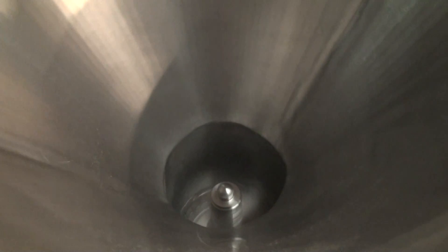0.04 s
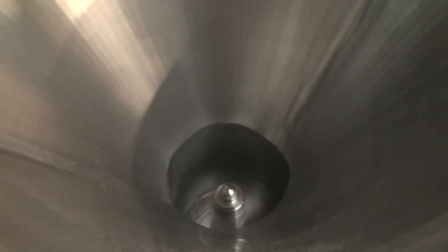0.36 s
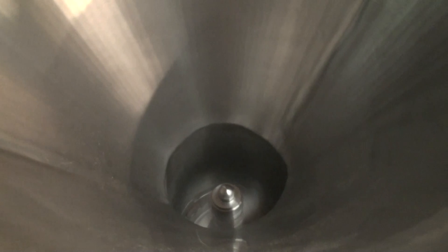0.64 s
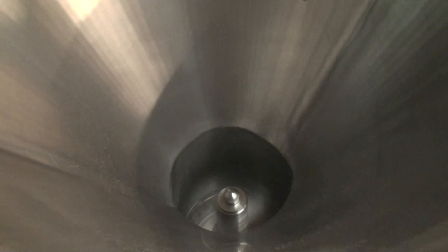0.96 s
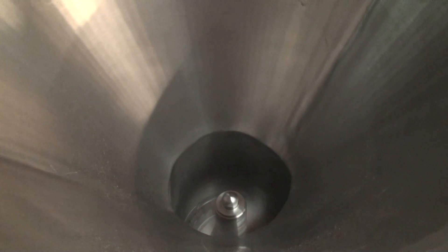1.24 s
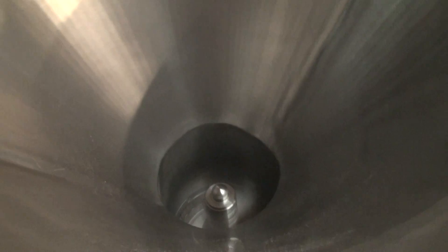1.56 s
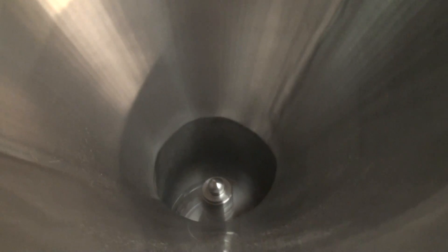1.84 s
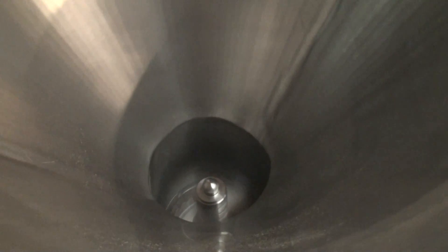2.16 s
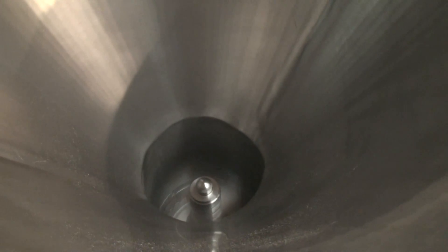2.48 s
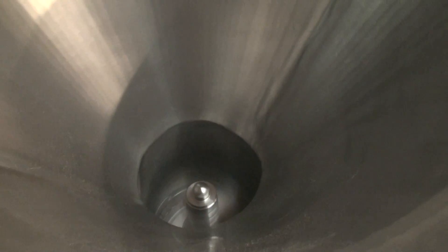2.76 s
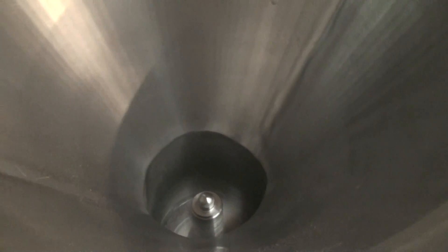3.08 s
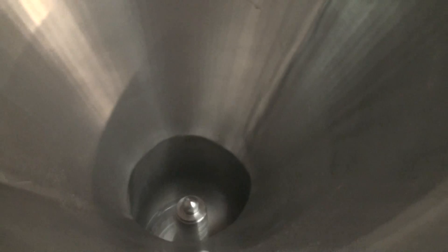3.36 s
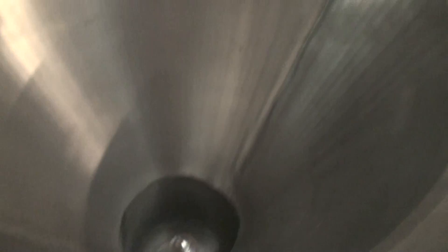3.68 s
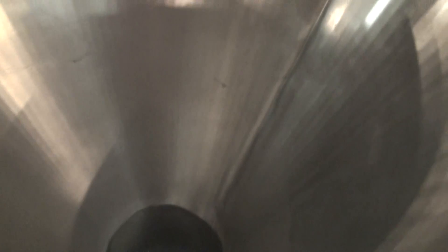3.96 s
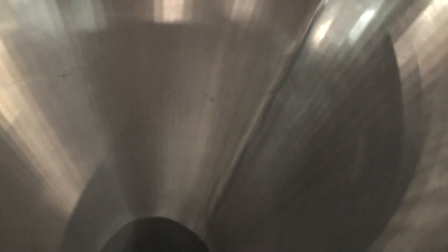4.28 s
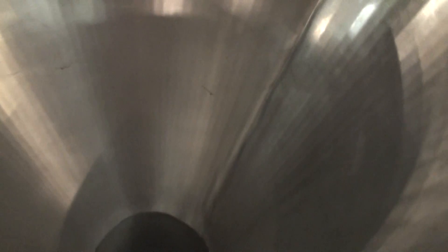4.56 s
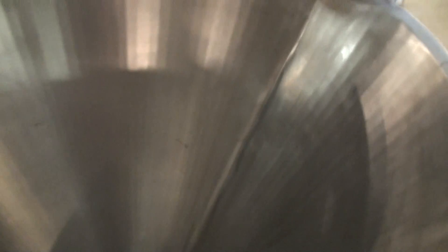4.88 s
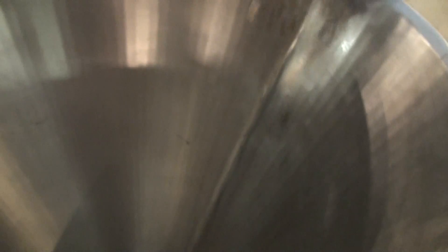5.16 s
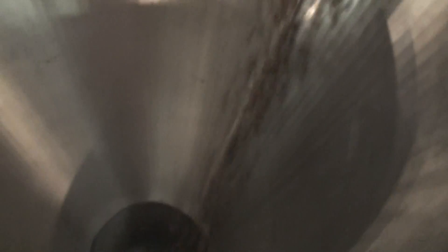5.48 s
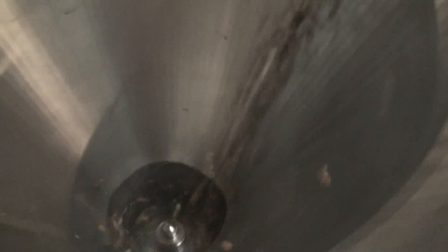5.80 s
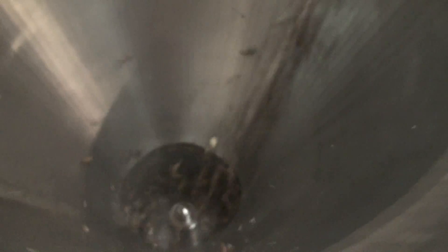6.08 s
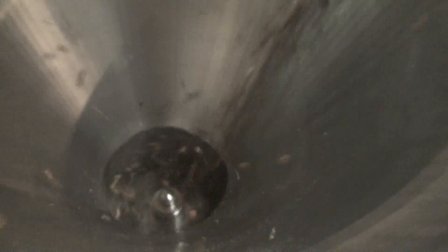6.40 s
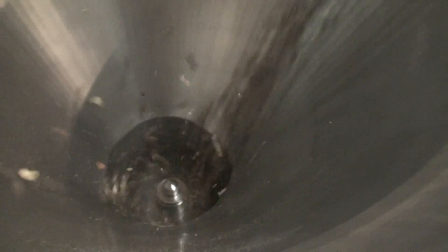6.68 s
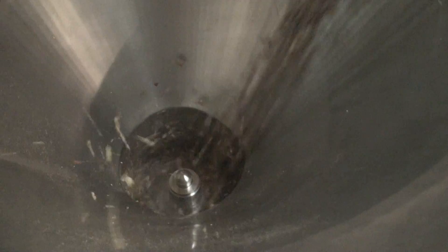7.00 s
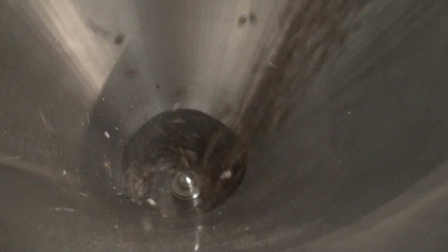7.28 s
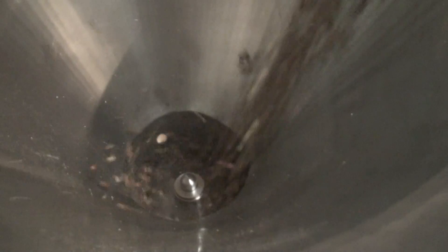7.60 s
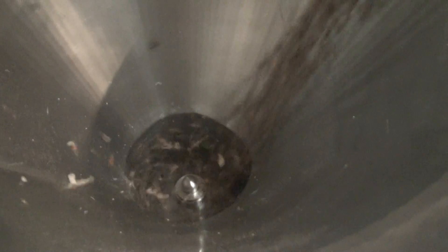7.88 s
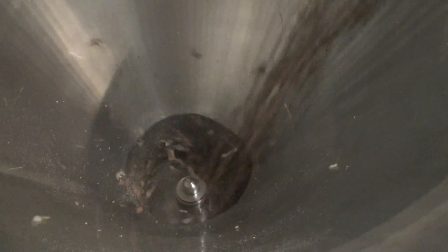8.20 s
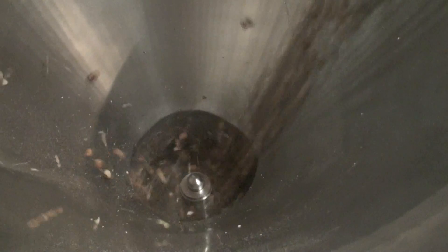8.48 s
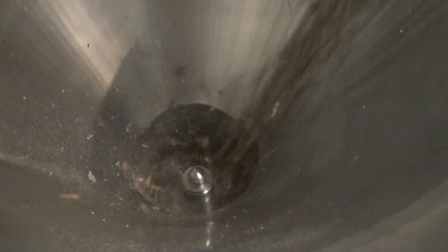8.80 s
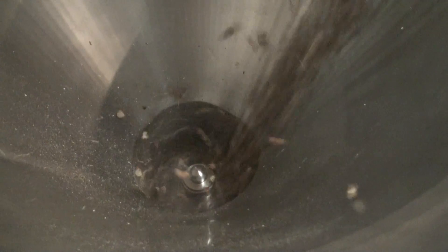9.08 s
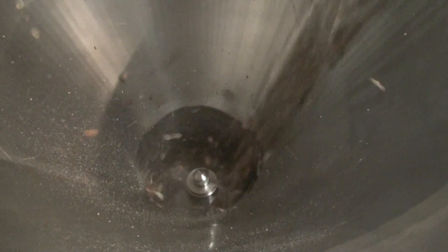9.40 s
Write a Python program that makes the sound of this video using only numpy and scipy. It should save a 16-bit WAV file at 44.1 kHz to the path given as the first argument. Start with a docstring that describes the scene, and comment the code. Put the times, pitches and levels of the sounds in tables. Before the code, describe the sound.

Steady motor hum and shrill whine give way to loud cracking, clattering and churning as nuts hit a grinder's spinning blades.

```python
"""Just above the steel hopper of a nut grinder. Running empty, its four-bladed rotor hums at the
blade-passing frequency, over turbulent air and a whine of shaft harmonics that shifts as the microphone
moves. From 5.4 s nuts pour in: they fracture on the blades, and their impacts excite the hopper's modes.
Gain control ducks the hum under them. As the chamber fills, a coarser churning grows and meal damps
the rotor."""
import sys
import numpy as np
from scipy import signal
from scipy.fft import rfft, irfft
from scipy.io import wavfile
from scipy.ndimage import uniform_filter1d, map_coordinates

SR = 44100
rng = np.random.default_rng(int(sys.argv[2]) if len(sys.argv) > 2 else 0)


def generate_wav(sig):
    """Save sig (samples, or channels by samples) to the path in sys.argv[1] as 16-bit PCM at SR."""
    pcm = np.round(np.clip(np.atleast_2d(sig).T, -1, 1) * 32767).astype(np.int16)
    wavfile.write(sys.argv[1], SR, pcm)


N = 416744
TIME = np.arange(N) / SR
BINS = np.fft.rfftfreq(N, 1 / SR)

SHAFT_HZ = 49.97
HANDFUL_AT_S, STREAM_AT_S, STREAM_RISE_S = 5.405, 5.52, 0.22

# All levels are relative: the scene's gains and the gain control act on them afterwards.
# microphone path: t/s, position (0 over the throat, 1 halfway up the wall, 2 at the rim)
MIC_PATH = [(0, 0.018), (3.55, 0), (3.95, 0.96), (4.65, 1.2), (4.9, 1.9), (5.35, 1.9), (5.6, 0.64),
            (6.1, 0.16)]
# left port against right port: f/Hz, level/dB
PORT_LEVEL = [(60, 1.0), (99, 0), (160, 3.5), (270, -0.9), (450, 0), (740, -3), (1220, -1.5), (2010, 0.28),
              (3330, 1), (5500, 1), (9080, -0.3), (15000, -0.3)]
# lead of the left port: f/Hz, phase/rad
PORT_PHASE = [(0, 0.16), (260, 0.52), (600, 0.54), (1980, 0.33), (2330, 0.34), (5430, 0.25), (9300, -0.27),
              (10200, -0.7), (11200, 0.0), (16000, -0.0)]
# likeness of the ports: f/Hz, coherence (0-1)
PORT_COHERENCE = [(30, 0.3), (90, 0.83), (200, 0.79), (1000, 0.85), (5000, 0.99), (8500, 0.87), (12500, 1)]

# air stirred by the rotor: f/Hz, spectral level/dB
AIR_SPECTRUM = [(25, -85), (70, -77), (170, -62), (360, -61.5), (520, -69), (1200, -66), (2450, -73),
                (3400, -68), (5400, -77), (6600, -72), (7600, -81.5), (8700, -81), (10900, -87.5),
                (12200, -80), (14500, -90), (16000, -98)]
# second and third blade harmonics: t/s, level/dB re the blade tone
BLADE_SECOND = [(0, -4), (3.5, -3.3), (5.2, -2.2), (6.2, -2.3), (7.7, -3.7), (7.87, -5), (7.98, -10),
                (8.3, -14), (8.6, -17)]
BLADE_THIRD = [(0, -10.5), (3.3, -11), (3.7, -13), (4.6, -12), (5.1, -10), (6.8, -11.5), (7.6, -16),
               (8.1, -11.5), (8.3, -24)]
# weak shaft harmonics: f/Hz, level/dB of each
WEAK_HARMONICS = [(60, -54), (300, -54), (1000, -63), (2500, -63.5), (3000, -57), (3150, -67), (3330, -54),
                  (4300, -65.5), (5200, -59), (5700, -62), (6500, -55), (7600, -68), (8400, -64),
                  (10800, -73), (11900, -67), (13500, -73), (16000, -80)]
# strong shaft harmonics: order, then level/dB at throat, wall and rim
STRONG_HARMONICS = [(1, -62, -64, -78), (2, -57, -54, -59), (3, -47, -48, -49), (5, -44, -46, -61),
                    (7, -49, -51, -50), (9, -48, -45, -58), (13, -53, -56, -54), (16, -48, -48, -47),
                    (20, -44, -51, -47), (24, -40, -39, -40), (27, -47, -50, -49), (28, -48, -51, -47),
                    (29, -50, -52, -49), (32, -51, -42, -45), (33, -46, -50, -46), (36, -38, -44, -40),
                    (40, -46, -44, -49), (44, -43, -50, -47), (48, -53, -51, -54), (66, -51, -50, -52),
                    (68, -42, -43, -43), (69, -47, -47, -49), (70, -40, -42, -39), (71, -42, -42, -45),
                    (73, -54, -50, -45), (77, -55, -55, -55), (82, -52, -56, -62), (90, -50, -50, -64),
                    (91, -49, -49, -54), (94, -44.5, -47, -49), (97, -53, -51, -51), (99, -44, -47, -52),
                    (100, -45, -47, -47), (102, -51, -53, -54), (104, -51, -53, -53), (105, -51, -53, -43),
                    (106, -53, -53, -53), (107, -51, -55, -52), (108, -52, -53, -53), (109, -54, -49, -46),
                    (118, -52, -49, -54), (123, -54, -57, -57), (124, -52, -50, -53), (125, -49, -46, -45),
                    (130, -51, -56, -58), (134, -46, -49, -54), (135, -51, -54, -52), (141, -59, -50, -48),
                    (144, -52, -51, -50), (145, -55, -52, -47), (153, -59, -61, -61), (154, -50, -52, -53),
                    (159, -58, -58, -70), (161, -58, -64, -70), (163, -58, -53, -55), (164, -60, -58, -57),
                    (170, -56, -57, -59), (181, -61, -65, -63), (190, -50, -54, -60), (196, -60, -59, -56),
                    (199, -54, -55, -54), (202, -61, -63, -69), (217, -62, -62, -66), (226, -62, -63, -61),
                    (235, -53, -52, -47), (239, -64, -62, -60), (243, -63, -57, -75), (244, -41, -42, -43),
                    (245, -52, -54, -59), (253, -59, -60, -57), (262, -58, -60, -60), (271, -58, -62, -57),
                    (280, -66, -60, -67), (307, -62, -66, -68)]
# four shrill shaft harmonics: order
SHRILL_ORDERS = [127, 136, 172, 208]
# their swells as the microphone moves, one list each: t/s, level/dB
SHRILL_LEVELS = [
    [(0, -35), (3.5, -35), (3.65, -37), (4.3, -36.5), (4.9, -38.5), (5.1, -42), (6.1, -32)],
    [(0, -37), (1, -35.5), (3.5, -35), (3.8, -37), (3.88, -34.5), (4, -35), (4.12, -41), (4.4, -38),
     (4.74, -39), (4.83, -33), (5, -42), (5.2, -44), (6.1, -36)],
    [(0, -50), (3.42, -47), (3.83, -53), (3.9, -46), (4, -46), (4.08, -57), (4.2, -47), (4.35, -47),
     (4.56, -55), (4.76, -45), (4.85, -52), (5.05, -44), (5.3, -46), (5.4, -51)],
    [(0, -52), (2.9, -51), (3.35, -48), (3.5, -52), (4, -50), (4.08, -56), (4.25, -48.5), (4.5, -50),
     (4.8, -49), (4.95, -43), (5.35, -46), (6.1, -53)],
]
# whistle: level/dB at throat, wall and rim
WHISTLE_LEVELS = [-36.5, -41, -39.5]
# shaft harmonics under load: order, start t/s, end t/s, level/dB
LOAD_HARMONICS = [(16, 6.6, 7.9, -42), (20, 7.25, 7.9, -47), (9, 8.2, 8.7, -42), (9, 8.7, 9.6, -48),
                  (18, 5.8, 9.6, -44.5), (27, 8.3, 9.6, -44)]

# dull thumps: t/s, level/dB
THUMP_EVENTS = [(5.461, -34), (6.424, -41), (6.689, -38), (7.109, -42), (7.274, -43), (7.347, -46),
                (7.37, -47), (7.488, -50), (7.741, -48), (7.782, -50)]
# whole nuts knocking in the throat: t/s, level/dB, f/Hz
KNOCK_EVENTS = [(6.428, -30, 486), (7.26, -31, 790), (7.371, -25, 580), (7.426, -29, 760),
                (7.446, -31, 700), (7.524, -27, 430), (7.648, -20.5, 250), (7.782, -24.5, 380),
                (7.861, -29, 230), (7.902, -28, 613), (8.09, -33, 450), (8.328, -32, 660),
                (8.378, -32, 900), (8.703, -33, 560)]
# hard strikes on one hopper mode: t/s, f/Hz, level/dB, skipping time/s
STRIKE_EVENTS = [(5.83, 2293, -33, .08), (5.87, 2543, -30, .04), (5.975, 4020, -29, .03),
                 (6.025, 3146, -33, .2), (6.3, 3146, -33, .07), (6.31, 2543, -32, .04),
                 (6.72, 3146, -36, .07), (6.93, 3960, -31, .03), (6.98, 2260, -33, .04),
                 (7.19, 3910, -32, .04), (7.28, 3146, -31, .17), (7.35, 3943, -29, 0.05),
                 (7.55, 2545, -35, .03), (7.655, 2545, -33, .04), (7.78, 3146, -33, 0.07),
                 (7.78, 3900, -30, .05), (8.43, 2535, -29.5, .08), (8.26, 3146, -37, .06),
                 (8.5, 3146, -35, .16), (8.58, 3935, -31, .03), (8.83, 3935, -26, .04),
                 (8.85, 3146, -37, .08), (9.02, 3146, -34, .14), (9.09, 2555, -31, .06)]
# handfuls landing on the wall: t/s, level/dB, decay time/s
SPLASH_EVENTS = [(5.407, -17, .012), (5.414, -14, .016), (5.433, -13, .011), (5.465, -13.5, 0.013),
                 (5.545, -16, .016), (5.602, -12, .018), (5.6432, -15, .012), (5.745, -16, .014),
                 (5.982, -16, .018), (6.0494, -15, .025), (6.427, -13, .009), (6.8418, -13.5, .018),
                 (6.95, -17, .045), (7.1503, -18, 0.011), (7.3644, -12.5, .022), (7.4284, -11, .03),
                 (7.4885, -16, .01), (7.5294, -15, .025), (7.648, -11, .025), (7.775, -12.5, .025),
                 (7.84, -16, .03), (7.8854, -15, .025), (8.037, -15, .012), (8.2, -14, .018),
                 (8.352, -15, .012), (8.4104, -15, .014), (8.85, -14, .022), (8.9636, -16, .015),
                 (9.008, -17, .012), (9.0974, -15, .028), (9.235, -17, .025), (9.3447, -13, .016),
                 (9.4186, -16, .012)]
# spectra of a knock, a clatter on the wall and a splinter's tick: f/Hz, level/dB
KNOCK_SPECTRUM = [(30, -22), (80, -11), (220, 4), (450, 4), (750, 2), (1200, 0), (2000, -8), (9000, -23),
                  (15000, -30)]
WALL_SPECTRUM = [(1000, -32), (4000, -17), (5400, -1), (6300, 5.5), (7200, 3), (8000, -1), (10500, -9),
                 (12200, -5), (14000, -18), (16000, -24)]
SPLINTER_SPECTRUM = [(1000, -30), (5000, -5), (7500, 0), (9500, -2), (10800, -6), (12200, 2), (14000, -8),
                     (16000, -11)]
# loose nuts tumbling, meal churning and nuts cracking: f/Hz, spectral level/dB
TUMBLE_SPECTRUM = [(20, -81), (50, -82), (100, -73.5), (200, -75), (400, -87), (900, -101), (3000, -130)]
CHURN_SPECTRUM = [(50, -106), (120, -84), (300, -76), (700, -77), (950, -70), (1200, -71), (1700, -63),
                  (2500, -67), (3400, -60), (5000, -61.5), (7000, -76), (10000, -71), (16000, -100)]
CRACK_SPECTRUM = [(30, -106), (120, -77), (300, -73), (700, -77), (1300, -76.5), (1800, -74), (2300, -66),
                  (4500, -63), (5400, -64), (6000, -60), (7100, -61.5), (7600, -65), (11000, -74.5),
                  (12300, -69.5), (14300, -82), (16000, -87)]
# hopper and casing modes: f/Hz, bandwidth/Hz, level/dB re the cracking
HOPPER_MODES = [(804, 30, 4), (985, 40, 6), (1488, 35, 9), (1700, 94, 3), (1770, 12, 1), (1985, 30, 4.5),
                (2110, 60, 4), (2243, 21, 8), (2293, 9, 12), (2365, 19, 6), (2542, 21, 12.5), (2760, 50, 1),
                (3143, 7, 13), (3570, 37, -1), (3860, 31, 4.5), (3936, 22, 10), (4020, 47, 2.5),
                (4295, 25, 4), (4885, 50, 7), (5680, 170, 1), (5950, 80, 7), (6480, 110, 5), (7140, 100, 5),
                (8390, 40, 4), (8980, 40, 2), (9860, 81, 4.5), (11380, 36, 8), (11720, 180, 2)]


def gain_of(db):
    """Amplitude ratio: a factor of ten per 20 dB."""
    return 10 ** (np.asarray(db) / 20)


def unit_rms(x):
    """Normalisation to unit mean power."""
    return x / np.sqrt(np.mean(x ** 2) + 1e-20)


def at_hz(spectrum, hz):
    """Interpolation on a logarithmic frequency axis."""
    f, value = np.transpose(spectrum)
    return np.interp(np.log(hz + 1), np.log(f + 1), value)


def curve(points, t=TIME):
    """Linear interpolation in time."""
    return np.interp(t, *np.transpose(points))


def ramp(start_s, length_s):
    """Linear transition from 0 to 1, then held."""
    return np.clip((TIME - start_s) / length_s, 0, 1)


def add(mix, start_s, sound):
    """Superposition of a delayed sound on the mix."""
    part = mix[round(start_s * SR):][:len(sound)]
    part += sound[:len(part)]


def drift(per_s):
    """Slow random modulation of about unit rms."""
    knots = rng.standard_normal(2048)
    return 1.2 * np.interp(TIME * per_s, np.arange(len(knots)), knots)


def impacts(per_s, spread_db):
    """Poisson train of impulses, a few much larger than the rest."""
    size = gain_of(spread_db * np.minimum(rng.exponential(1, N), 4))
    return unit_rms(size * rng.choice([-1, 1], N) * (rng.random(N) < per_s / SR))


def burst(spectrum, decay_s, rise_share=0.13):
    """Unresolved impacts merge into noise that builds, then decays exponentially."""
    t = np.arange(SR // 6) / SR
    shape = gain_of(at_hz(spectrum, np.fft.rfftfreq(len(t), 1 / SR)))
    noise = unit_rms(irfft(rfft(rng.standard_normal(len(t))) * shape, len(t)))
    return noise * (1 - np.exp(-t / (rise_share * decay_s))) * np.exp(-t / decay_s)


def ticks(spectrum, per_s, spread_db, decay_s, kinds):
    """Shot noise: impulse trains, each convolved with its own short burst."""
    return sum(signal.oaconvolve(impacts(per_s / kinds, spread_db), burst(spectrum, decay_s))[:N]
               for _ in range(kinds))


def coloured(drive, spectrum):
    """Partial coherence: a filtered white drive reaches both ports, with a diffuse share that differs."""
    coherence = np.clip(at_hz(PORT_COHERENCE, BINS), 0, 1)
    direct = rfft(drive) * np.sqrt((1 + coherence) / 2)
    diffuse = rfft(rng.standard_normal(N)) * np.sqrt((1 - coherence) / 2)
    ports = np.array([direct + diffuse, direct - diffuse])
    return irfft(ports * gain_of(at_hz(spectrum, BINS)) * np.sqrt(SR / 2), N)


def air_rush(angle, chop=0.22, gust_db=0.4, rim_db=-0.35):
    """Turbulence noise, amplitude-modulated by the passing blades."""
    chopped = unit_rms(rng.standard_normal(N) * (1 + chop * np.cos(4 * angle)))
    air = coloured(chopped, AIR_SPECTRUM)
    return air * gain_of(gust_db * drift(15) + rim_db * np.clip(curve(MIC_PATH), 0, 1))


def blade_hum(angle, tone_db=-21.5, flutter_db=0.42, wall_db=-0.2):
    """Blade-passing tone: four pressure dips a turn. The choking throat absorbs its upper harmonics."""
    level_db = tone_db + wall_db * np.sin(np.pi * curve(MIC_PATH) / 2) ** 2 + flutter_db * drift(25)
    second = gain_of(curve(BLADE_SECOND)) * np.cos(8 * angle)
    third = gain_of(curve(BLADE_THIRD)) * np.cos(12 * angle + 2)  # phase-shifted by the throat
    return -np.sqrt(2) * gain_of(level_db) * (np.cos(4 * angle) + second + third)


def rub_phases(orders, rub_hz=3480, width_hz=420, sweep=0.071):
    """Quadratic phase, in turns, gathers one band into a light rub's rising chirp; the rest is random."""
    offset = orders - rub_hz / SHAFT_HZ
    return np.where(abs(offset) * SHAFT_HZ < width_hz / 2, -sweep * offset ** 2, rng.random(len(orders)))


def shaft_whine(angle, waver_db=0.5, moving_waver_db=1.5, scatter_db=2.5, turn_size=2048, frames=240):
    """A rattle repeated every turn has a line spectrum; its levels shift as the microphone moves."""
    orders = np.arange(1, 330)
    moments = np.linspace(0, TIME[-1], frames)
    position = curve(MIC_PATH, moments)
    weak_db = at_hz(WEAK_HARMONICS, orders * SHAFT_HZ) + scatter_db * rng.uniform(-1, 1, len(orders))
    level_db = np.tile(weak_db, (frames, 1))
    for order, *by_position_db in STRONG_HARMONICS:
        level_db[:, round(order) - 1] = np.interp(position, [0, 1, 2], by_position_db)
    waver = unit_rms(uniform_filter1d(rng.standard_normal(level_db.shape), size=8, axis=0))
    level_db += waver * (waver_db + moving_waver_db * np.clip(position, 0, 1)[:, None])
    for order, points in zip(SHRILL_ORDERS, SHRILL_LEVELS):
        level_db[:, order - 1] = curve(points, moments) + waver_db * waver[:, order - 1]
    lines = gain_of(level_db) * np.exp(2j * np.pi * rub_phases(orders))
    # the waveform of one turn for each frame, read out at the shaft's angle
    turns = irfft(np.pad(lines, ((0, 0), (1, 0))), turn_size) * turn_size / np.sqrt(2)
    frame = TIME / TIME[-1] * (frames - 1)
    within_turn = angle / (2 * np.pi) % 1 * turn_size
    return map_coordinates(turns, [frame, within_turn], order=3, mode="grid-wrap")


def whistle(angle, order=63, vibrato_rad=1.0, waver_db=0.6):
    """Phase modulation: the pitch of a clean whistle swings once a turn."""
    level_db = np.interp(curve(MIC_PATH), [0, 1, 2], WHISTLE_LEVELS) + waver_db * drift(8)
    return np.sqrt(2) * gain_of(level_db) * np.sin(order * angle + vibrato_rad * np.sin(angle))


def strain(angle, waver_db=2.0, fade_s=0.1):
    """Forced vibration: faint harmonics come and go as the shaft works against the meal."""
    out = np.zeros(N)
    for order, start, end, db in LOAD_HARMONICS:
        held = ramp(start, fade_s) * (1 - ramp(end - fade_s, fade_s))
        out += held * gain_of(db + waver_db * drift(9)) * np.sin(round(order) * angle)
    return np.sqrt(2) * out


def pour(handful_s=0.14, handful_flow=0.34):
    """Flow of nuts: a parabolic pulse for the first handful, then a steady stream of 1."""
    u = ramp(HANDFUL_AT_S, handful_s)
    return handful_flow * 4 * u * (1 - u) + ramp(STREAM_AT_S, STREAM_RISE_S)


def fullness(first_fill=0.095, midpoint_s=8.27, filling_s=0.34):
    """Logistic growth of the meal in the chamber, from a small share towards 1."""
    return first_fill + (1 - first_fill) / (1 + np.exp((midpoint_s - TIME) / filling_s))


def thumps(push_s=0.0024, boost_db=8.0):
    """Low pressure pulses: one compression, then a weaker rarefaction."""
    u, out = np.arange(SR // 10) / SR / push_s, np.zeros(N)
    for start, db in THUMP_EVENTS:
        add(out, start, gain_of(db + boost_db) * u * (2 - u) * np.exp(-u))
    return out


def knocks(crack_s=0.008, crack_db=-3.0, body_s=0.006, body_db=-6.0):
    """Impact of a whole nut on a blade: a broadband crack and a hollow damped oscillation."""
    t, out = np.arange(SR // 6) / SR, np.zeros(N)
    for start, db, hz in KNOCK_EVENTS:
        crack = gain_of(crack_db) * burst(KNOCK_SPECTRUM, crack_s)
        body = gain_of(body_db) * np.exp(-t / body_s) * np.sin(2 * np.pi * hz * t)
        add(out, start, gain_of(db) * (crack + body))
    return out


def strikes(rise_s=0.01, decay_s=0.046, uneven=0.22, wander_rad=0.55):
    """Resonance: a nut skipping unevenly along the steel pumps one mode, which then decays freely."""
    t, out = np.arange(SR // 2) / SR, np.zeros(N)
    for start, hz, db, skip_s in STRIKE_EVENTS:
        swell = (1 - np.exp(-t / rise_s)) * np.exp(-np.maximum(t - skip_s, 0) / decay_s)
        swell *= 1 + uneven * drift(92)[:len(t)]
        phase = 2 * np.pi * hz * t + wander_rad * drift(28)[:len(t)]
        add(out, start, gain_of(db) * swell * np.sin(phase))
    return out


def splashes(trim_db=-8.0):
    """Incoherent summation: each handful lands on the wall as one bright clatter."""
    out = np.zeros(N)
    for start, db, decay_s in SPLASH_EVENTS:
        add(out, start, gain_of(db + trim_db) * burst(WALL_SPECTRUM, decay_s))
    return out


def chips(fill, gain_db=-37.5):
    """Rebound: chips flung back up tick on the wall, with power proportional to the fill."""
    ticking = ticks(WALL_SPECTRUM, per_s=70, spread_db=2.2, decay_s=0.0049, kinds=5)
    return unit_rms(ticking) * gain_of(gain_db) * np.sqrt(fill)


def splinters(flow, fill, flurry_db=3.3, gain_db=-39, full_db=1.5):
    """Brief contacts radiate treble: flurries of hard splinters on steel, louder from a full chamber."""
    ticking = ticks(SPLINTER_SPECTRUM, per_s=300, spread_db=2.5, decay_s=0.00065, kinds=8)
    flurries = unit_rms(ticking * gain_of(flurry_db * drift(13)))
    return flurries * flow ** 2 * gain_of(gain_db + full_db * fill)


def hopper_ring(blows_per_s=900, clump_db=0.8, trim_db=-0.5, lowest_hz=150):
    """Modal excitation: fragments hit different places, so each mode gets its own train of blows."""
    t, out = np.arange(SR // 4) / SR, np.zeros(N)
    for hz, width_hz, db in HOPPER_MODES:
        response = np.exp(-np.pi * width_hz * t) * np.sin(2 * np.pi * hz * t)
        blows = impacts(blows_per_s, spread_db=1.0) * gain_of(clump_db * drift(7))
        ringing = unit_rms(signal.oaconvolve(blows, response)[:N])
        noise_band_hz = np.pi * width_hz / 2
        out += ringing * gain_of(db + trim_db + at_hz(CRACK_SPECTRUM, hz)) * np.sqrt(noise_band_hz)
    return signal.sosfilt(signal.butter(1, lowest_hz, "high", fs=SR, output="sos"), out)


def wall_reflections(x, t60_s=0.035):
    """All-pass reverberation: dense echoes between the steel walls smear impacts without colour."""
    t = np.arange(SR // 10) / SR
    echoes = rfft(rng.standard_normal(len(t)) * gain_of(-60 * t / t60_s), N)
    return irfft(rfft(x) * echoes / (abs(echoes) + 1e-9), N)


def grinding(angle, flow, cracks_per_s=14000, clump_db=0.55, swing=0.044, surge_db=1.0):
    """Brittle fracture in clumps, harder once a turn; tumbling yields to churning as the chamber fills."""
    fill = fullness()
    bite = gain_of(clump_db * drift(110)) * (1 + swing * np.cos(angle))
    shatter = unit_rms(wall_reflections(impacts(cracks_per_s, spread_db=1.8) * bite))
    cracking = coloured(shatter, CRACK_SPECTRUM) + hopper_ring() * np.sqrt(flow)
    cracking *= flow ** 0.25 * gain_of(surge_db * drift(22))
    churning = coloured(rng.standard_normal(N) * bite, CHURN_SPECTRUM) * fill
    tumbling = coloured(impacts(per_s=400, spread_db=4.0), TUMBLE_SPECTRUM) * (1 - fill) ** 2
    contents = (churning + tumbling + chips(fill)) * ramp(HANDFUL_AT_S, 0.033)
    return cracking + contents + splinters(flow, fill)


def gain_control(x, threshold_db=-25.5, ratio=3.48, follow_s=0.016, sensed_hz=1500):
    """Compression: loud treble turns everything down, so the hum ducks under the nuts."""
    treble = signal.sosfilt(signal.butter(2, sensed_hz, "high", fs=SR, output="sos"), x.mean(0))
    pole = np.exp(-1 / (follow_s * SR))
    level_db = 10 * np.log10(signal.lfilter([1 - pole], [1, -pole], treble ** 2) + 1e-12)
    return x * gain_of(-np.maximum(level_db - threshold_db, 0) * (1 - 1 / ratio))


def scene(choke_db=-7.5, stream_db=9, build_db_per_s=1.97):
    """Superposition of the rotor and the nuts, with one shaft angle timing all that turns."""
    angle = 2 * np.pi * np.cumsum(SHAFT_HZ + 0.0043 * drift(5.96)) / SR
    flow = pour()
    rotor = blade_hum(angle) + shaft_whine(angle) + whistle(angle) + air_rush(angle)
    rotor *= gain_of(choke_db * ramp(7.78, 0.65))  # meal chokes the throat and damps the rotor
    machine = rotor + strain(angle)
    nuts = grinding(angle, flow) + knocks() + splashes() + strikes() + thumps()
    # the nuts grow louder with the flow, and as they gather at the blades
    gathering_s = np.maximum(TIME - STREAM_AT_S - STREAM_RISE_S, 0)
    return machine + nuts * gain_of(stream_db * flow + build_db_per_s * gathering_s)


def record(dry):
    """Level and phase differences between two close ports, then compression and a low-pass filter."""
    port = gain_of(at_hz(PORT_LEVEL, BINS) / 2) * np.exp(0.5j * at_hz(PORT_PHASE, BINS))
    stereo = irfft(rfft(dry) * np.array([port, 1 / port]), N)
    low_pass = signal.firwin(511, cutoff=16350, window=("kaiser", 9), fs=SR)
    return signal.oaconvolve(gain_control(stereo), low_pass[None], "same")


dry = scene()
out = record(dry)
generate_wav(out)
```